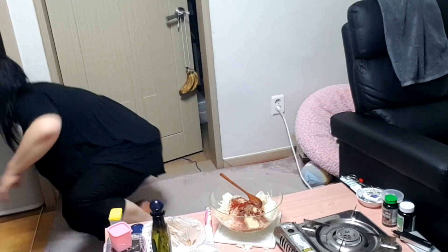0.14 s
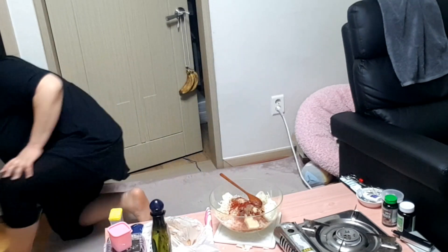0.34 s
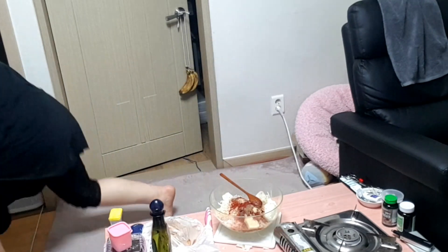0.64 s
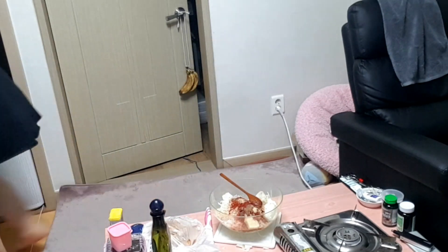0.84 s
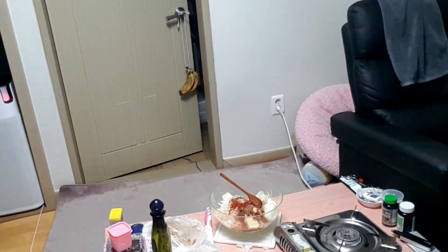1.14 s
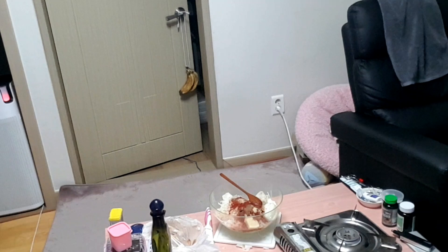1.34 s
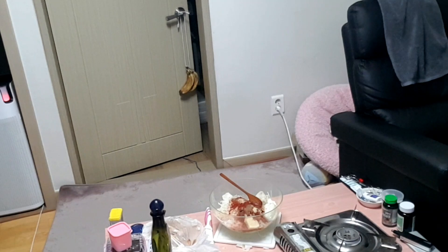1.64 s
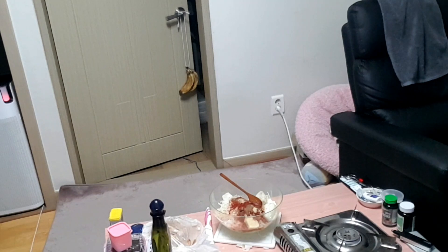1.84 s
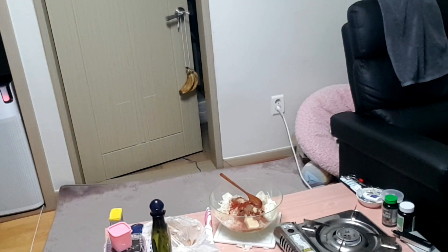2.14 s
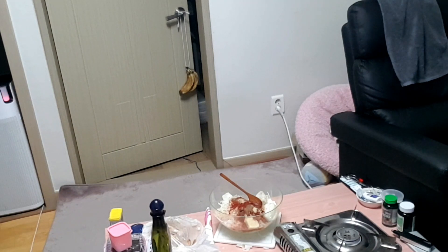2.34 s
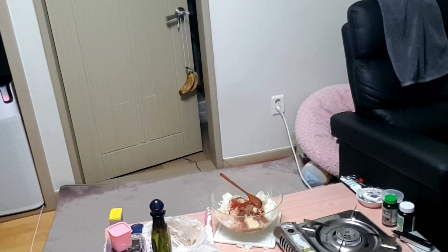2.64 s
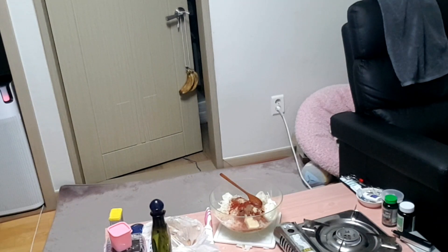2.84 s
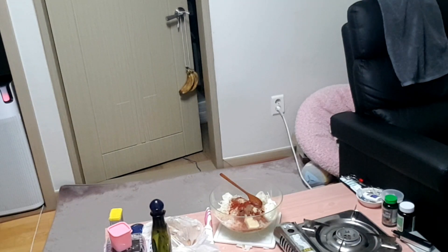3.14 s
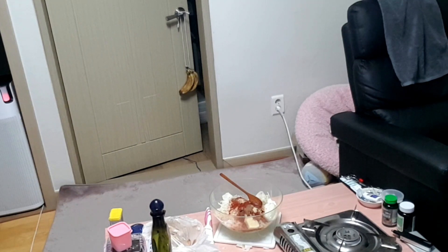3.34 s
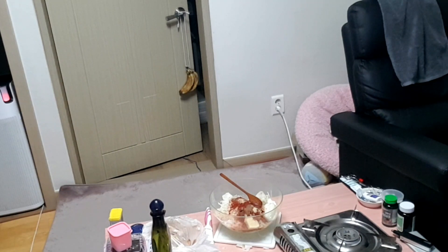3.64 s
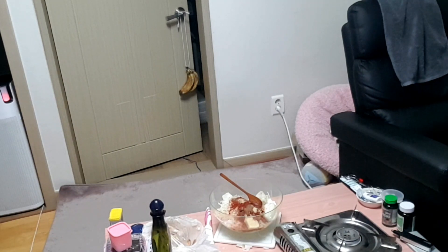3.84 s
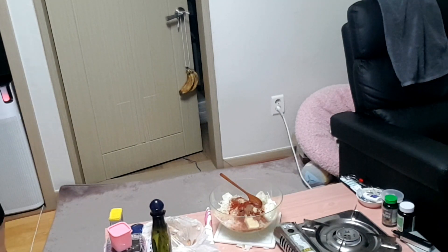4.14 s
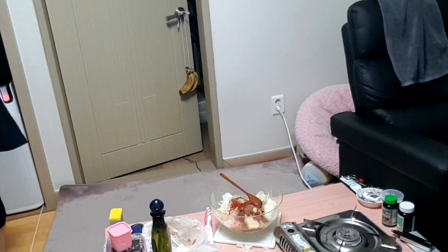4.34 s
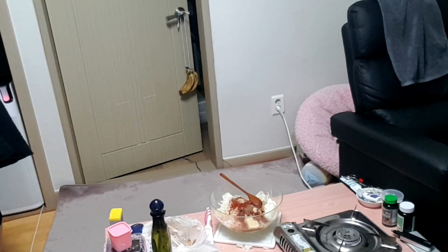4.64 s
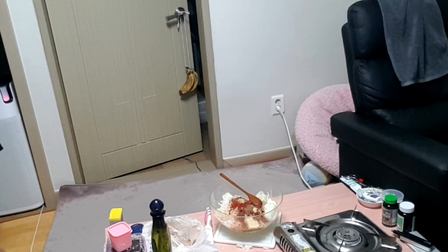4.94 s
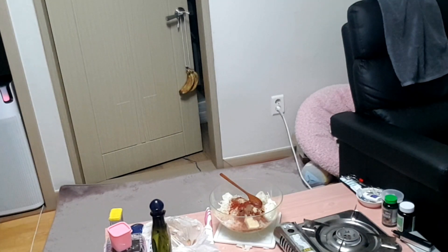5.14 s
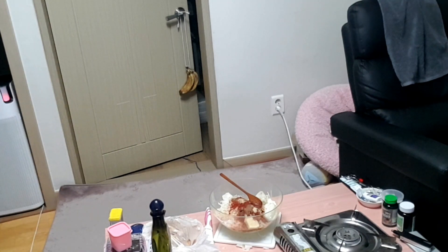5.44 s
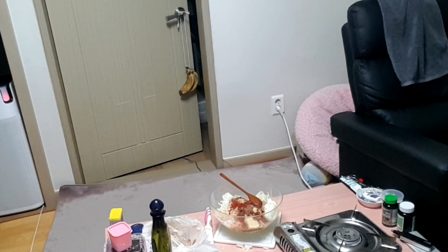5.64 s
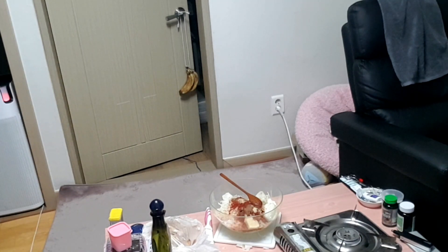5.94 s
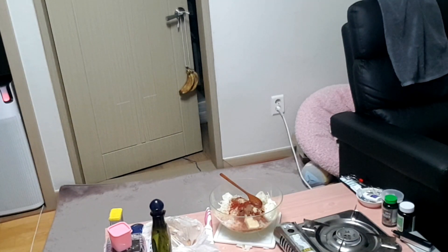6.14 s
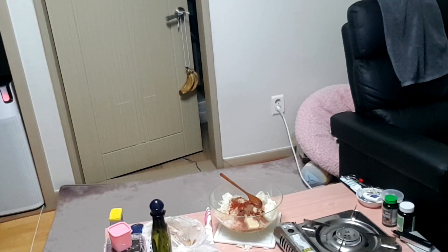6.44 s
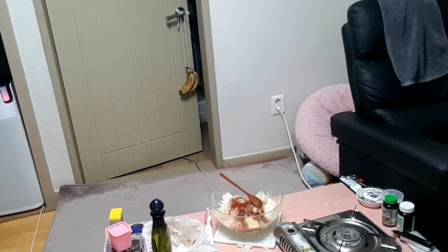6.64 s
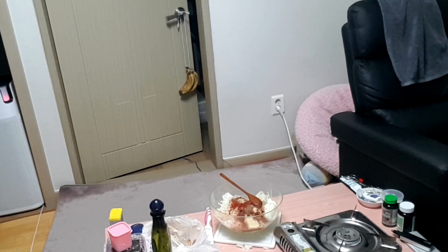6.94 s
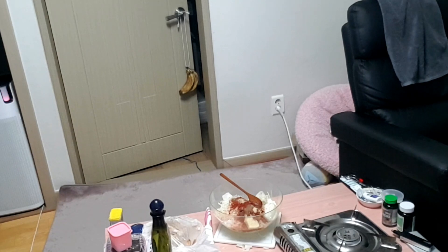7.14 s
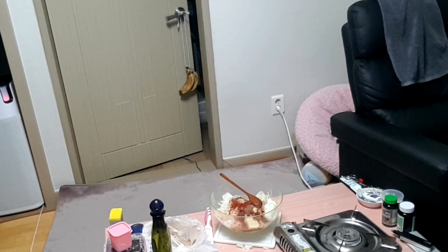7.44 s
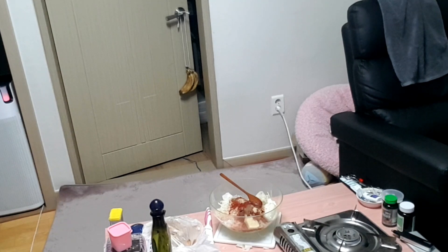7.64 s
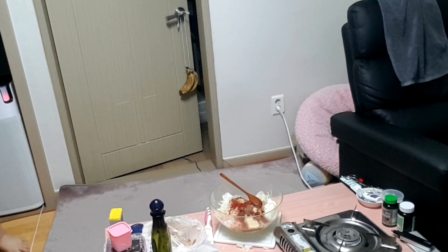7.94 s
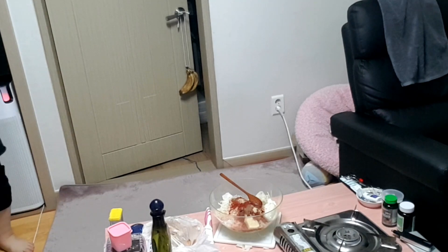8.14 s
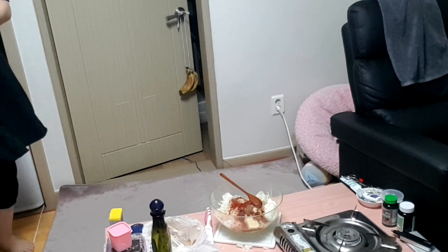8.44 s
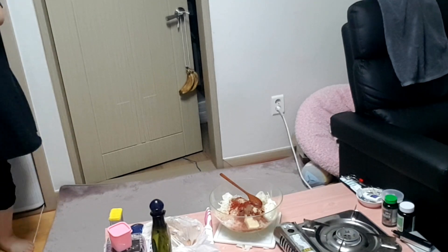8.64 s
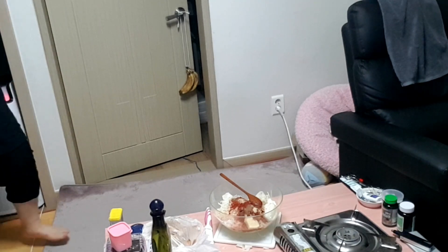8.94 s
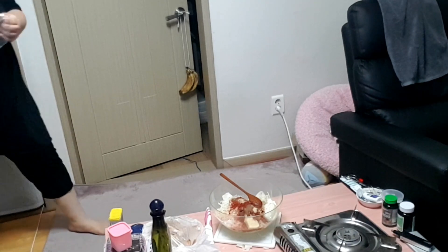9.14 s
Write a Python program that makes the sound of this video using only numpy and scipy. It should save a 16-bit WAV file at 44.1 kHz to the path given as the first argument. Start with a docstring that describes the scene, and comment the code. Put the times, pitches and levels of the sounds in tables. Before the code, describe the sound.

Plastic rustles and containers click and knock in a humming fridge, then its door thumps shut and a bag crinkles.

```python
"""A fridge motor hums throughout in a small furnished room. First someone tugs at a plastic bag in the
fridge: film and clothes rustle in showers of tiny snaps, among brief scrapes and sharp plastic clicks.
From about 5 s containers knock on the shelves more often, and hollow ones ring briefly. Near 7.9 s the
door thumps shut and rebounds on its seal, exciting its panel, the cabinet and the racks.
Last, the bag rustles again as it is carried out into the room."""
import sys
import numpy as np
from scipy import signal
from scipy.fft import rfft, irfft, next_fast_len
from scipy.io import wavfile
from scipy.ndimage import map_coordinates

SR = 44100
rng = np.random.default_rng(int(sys.argv[2]) if len(sys.argv) > 2 else 0)


def put_to_file(sound):
    """Save the sound as 16-bit audio at rate SR, in the file named by the first command-line argument."""
    columns = np.atleast_2d(sound).T  # one column per channel
    safe = np.clip(columns, -1, 1)
    whole_steps = np.round(safe * 32767)
    wavfile.write(sys.argv[1], SR, whole_steps.astype(np.int16))


N = 409688

# Likeness of left and right in a diffuse field: (frequency [Hz], coherence [0..1])
COHERENCE = [(100, 0.98), (250, 0.98), (500, 0.44), (1000, 0.095), (3000, 0), (15000, 0)]
# Reverberation of the room: (frequency [Hz], t60 [s])
ROOM_DECAY = [(80, 0.36), (250, 0.35), (600, 0.33), (2000, 0.22), (5000, 0.27), (14000, 0.22)]
# Motor tones: (frequency [Hz], level [dB])
MOTOR_TONES = [(172.3, -61.5), (780.6, -84)]
# Spectra of air, rubbing, crinkling, plastic, shelves and door racks: (frequency [Hz], gain [dB])
AIR_SPECTRUM = [(12, -70), (20, -16), (64, -17.5), (106, -6.5), (140, -9.5), (175, -2), (245, -11.5),
                (404, -22), (439, -25.5), (667, -32.5), (767, -28.5), (932, -33.5), (3850, -67.5),
                (7110, -58.5), (15500, -50)]
RUB_SPECTRUM = [(150, -22.5), (400, 2.5), (750, 0), (1200, 2.5), (2200, -1), (3500, -7.5), (5200, -13.5),
                (9000, -31), (16000, -27)]
CRINKLE_SPECTRUM = [(1000, -49), (3000, -0.5), (5000, -5.5), (7000, -7.5), (10000, -4.5), (13000, -7.5),
                    (15500, -12)]
PLASTIC_SPECTRUM = [(100, -14), (450, -1), (800, -1.5), (1300, 2), (2200, 0.5), (3200, -4.5), (4600, -11.5),
                    (7000, -15.5), (10000, -16), (15500, -21.5)]
SHELF_SPECTRUM = [(30, -20), (75, -7), (120, 4.5), (200, 0), (350, -6.5), (600, -11), (800, -16.5),
                  (1150, -12.5), (1700, -18.5), (3000, -22.5), (6000, -29), (15000, -24)]
RACK_SPECTRUM = [(60, -27), (120, 8), (200, 2), (310, -3.5), (450, -8), (800, -10), (1400, -10),
                 (2200, -14), (3200, -22), (4500, -31), (8000, -41), (15000, -49)]
# Spells in which clothes rub: (start [s], end [s], level [dB])
CLOTHES_SPELLS = [(0.0, 0.33, -59.5), (0.4, 0.918, -62), (1.294, 1.95, -67.5), (2.258, 3.372, -63.5),
                  (3.55, 3.91, -66.5), (4.78, 5.585, -65.5), (6.25, 7.2, -63.5), (8.15, 9.29, -65)]
# Tugs at the thin bag: (peak time [s], rubbing level [dB], crinkle over rubbing [dB], swell [s])
BAG_TUGS = [(0.175, -66, -1.5, .035), (0.275, -58, -12, .018), (1.63, -64, 1.5, 0.042),
            (1.695, -57, -5, 0.021), (1.89, -71.5, 1, 0.03), (2.09, -59, -3.5, 0.022),
            (2.13, -59, -1.5, 0.0071), (2.287, -49.5, -5.5, 0.038), (2.432, -53, -2.5, 0.019),
            (2.49, -51.5, -4.5, 0.043), (2.66, -65.5, 3.5, 0.037), (2.865, -62.5, 2.5, .025),
            (3.026, -48, -4.5, 0.036), (3.15, -56, -5.5, 0.037), (3.225, -54.5, -7, 0.031),
            (3.78, -67.5, 6.5, 0.018), (3.855, -60.5, -5, 0.022), (4.255, -65, -9, 0.053),
            (4.85, -60, 1, 0.031), (4.971, -59.5, 2, .024), (6.265, -57.5, 1, 0.024),
            (6.555, -60.5, -2.5, 0.031), (6.68, -59, -10, 0.045), (6.925, -50.5, -16, 0.024),
            (7.1, -58, -14, 0.0099), (7.701, -60, 1.5, 0.018), (8.14, -57, -6, 0.022),
            (8.21, -58.5, 2.5, 0.019), (8.293, -62.5, 2, 0.017), (8.414, -56, 0, 0.025),
            (8.545, -56.5, 4, 0.023), (8.63, -68, -8, 0.019), (8.7, -61.5, 4.5, 0.06),
            (8.88, -59, 3, 0.029), (9.01, -56.5, 3, 0.011), (9.08, -54, 1.5, 0.023),
            (9.185, -52.5, -0.5, 0.028)]
# Short slides: (peak time [s], level [dB], swell [s], resonance [Hz])
SLIDES = [(0.14, -60.5, 0.02, 3500), (0.275, -57, 0.013, 900), (0.272, -65, .012, 9050),
          (0.79, -62.5, 0.023, 3550), (0.878, -52, 0.01, 1880), (2.258, -60, 0.0082, 3000),
          (6.189, -58, .011, 2980), (6.65, -60, 0.0077, 2750), (6.83, -63, 0.0082, 2200),
          (7.158, -61, .005, 2180)]
# Small hard contacts: (time [s], level [dB], treble gain [dB], contact length [s], resonance [Hz])
PLASTIC_CONTACTS = [(.491, -38, 0.5, 0.017, 1890), (.575, -44, -6, 0.021, 1830),
                    (0.869, -54, -10, 0.0046, 1950), (0.979, -41.5, 16, 0.008, 1810),
                    (1.097, -32, -9, 0.00061, 1230), (1.1, -29.5, 4, 0.00076, 2150),
                    (1.327, -50.5, 5, 0.016, 2800), (4.017, -41.5, -1.5, 0.015, 1480),
                    (4.074, -43.5, 9.5, 0.0052, 2180), (5.032, -38, 2, 0.0065, 2650),
                    (5.119, -52.5, 5, 0.0045, 2300), (5.223, -32, 0, 0.022, 3050),
                    (5.238, -41, 13.5, 0.017, 1490), (5.264, -36.5, -19, 0.0041, 2280),
                    (5.406, -42, -24, 0.0074, 1470), (6.171, -51, 9.5, 0.0051, 3040),
                    (7.198, -49, 8, 0.011, 2620), (7.702, -32.5, 1, 0.009, 2050),
                    (7.894, -45, 9, 0.003, 3800), (7.998, -45.5, 8, 0.015, 2500),
                    (8.805, -32.5, 0.5, 0.0018, 2450), (8.992, -47.5, 16, 0.0066, 1280)]
# Two footsteps near the start, then blows on shelves: (time [s], relative level [dB], corner [Hz], bass gain
# [dB], contact length [s])
THUDS = [(.492, -46, 1300, -11, 0.0062), (.578, -48, 1000, -3, .02),
         (5.302, -41.5, 160, -2.5, 0.0086), (5.407, -43, 1500, 4, 0.0083),
         (6.155, -45, 1800, -12, 0.012), (6.261, -32.5, 1250, -2.5, 0.016),
         (6.387, -38.5, 1140, -5.5, 0.013), (6.543, -36.5, 1250, -4.5, 0.024),
         (6.88, -50, 1800, 1, 0.0054), (6.916, -33.5, 810, 2, 0.014), (7.023, -42, 1800, -2, 0.0026),
         (7.071, -39, 875, 2, 0.0062), (7.197, -27.5, 1300, -11, 0.009),
         (7.258, -48, 1400, -12, 0.011), (7.411, -35, 650, 5, 0.0039), (7.44, -42, 302, 8, 0.016)]
# Notes of nudged hollow containers: (time [s], frequency [Hz], relative level [dB], t60 [s])
CONTAINER_NOTES = [(2.458, 614, -36.5, 0.18), (2.455, 1095, -40, 0.05), (2.45, 800, -46, 0.088),
                   (5.238, 1440, -35.5, 0.2), (5.304, 131, -28, 0.29), (6.769, 228.7, -38.5, 0.054),
                   (6.772, 400, -39.5, 0.086), (6.265, 352, -41.5, 0.13), (6.56, 620, -43.5, 0.11),
                   (6.92, 300, -42, .1), (7.198, 538, -25, 0.12), (7.198, 1104, -27, 0.026),
                   (7.2, 324, -47, 0.23), (7.2, 830, -31.5, 0.16), (7.2, 1130, -35, .25)]
# Modes of the cabinet and its racks: (frequency [Hz], relative level [dB])
CABINET_MODES = [(222, 0), (320, -3.5), (366, -1), (445, 0.5), (484, -6), (560, -4.5), (591, -3), (634, -6),
                 (727, -6.5), (804, -15), (1066, -10), (1143, -9), (1201, -9), (1342, -9), (1442, -13),
                 (1687, -25)]
# Deep modes of the door panel: (frequency [Hz], relative level [dB], t60 [s])
PANEL_MODES = [(36, -10, 0.26), (67.7, -3, 0.18), (80, 3, 0.17), (110, -6.5, 0.52), (140, -1.5, 0.14),
               (176, 2.5, 0.069)]
# Door against frame: (time [s], panel gain [dB], rattle level [dB], contact length [s], corner [Hz])
DOOR_BLOWS = [(7.8863, -14.5, -15.5, 0.0069, 6000), (7.9009, -5.5, -16, 0.0045, 3480),
              (7.9304, -14, -23, 0.0092, 1500), (7.9986, -23.5, -22, 0.0018, 1170),
              (8.0106, -15.5, -30.5, 0.0065, 890), (8.052, -20.5, -31.5, 0.0038, 1290),
              (8.078, -23, -38, 0.006, 800)]

STROKE_LEAD_S = .25  # a stroke's envelope begins this long before its peak


def amp(db):
    """Amplitude ratio: a factor of ten for every 20 dB."""
    return 10 ** (np.asarray(db) / 20)


def unit(x):
    """Normalisation to an rms of 1."""
    return x / np.sqrt(np.mean(x ** 2) + 1e-20)


def along(points, hz):
    """Interpolation of (frequency, value) points on a logarithmic frequency axis."""
    f, v = np.transpose(points)
    return np.interp(np.log(hz + 1), np.log(f + 1), v)


def wobble(per_s):
    """Slow random modulation: a spline through per_s random knots a second."""
    knots = rng.standard_normal(int(N * per_s / SR) + 4)
    return map_coordinates(knots, [np.arange(N) * per_s / SR])


def coloured(x, gain):
    """Minimum-phase filtering: the causal response with magnitude gain(hz)."""
    m = 2 ** 14
    cepstrum = irfft(np.log(np.maximum(gain(np.fft.rfftfreq(m, 1 / SR)), 1e-6)))
    cepstrum[1:m // 2] *= 2
    cepstrum[m // 2 + 1:] = 0
    response = irfft(np.exp(rfft(cepstrum)))[:m // 2]
    size = next_fast_len(x.shape[-1] + m // 2, real=True)
    return irfft(rfft(x, size) * rfft(response, size), size)[..., :x.shape[-1]]


def add(track, s, sound):
    """Superposition: a sound joins the track at s seconds."""
    start = round(s * SR)
    sound, start = sound[:, max(0, -start):], max(0, start)
    track[:, start:start + sound.shape[-1]] += sound[:, :N - start]


def at_level(sound, db):
    """Equal energy: a transient is scaled to match 10 ms of steady sound at db."""
    return amp(db) * sound / np.sqrt(np.sum(sound ** 2) / (2 * SR / 100))


def diffuse(size):
    """Diffuse field: noise from all around is coherent in the bass, unrelated in the treble."""
    m = next_fast_len(size, real=True)
    angle = np.arccos(np.clip(along(COHERENCE, np.fft.rfftfreq(m, 1 / SR)), -1, 1)) / 2
    spectra = rfft(rng.standard_normal((2, m))) * [np.cos(angle), np.sin(angle)]
    mid, side = irfft(spectra, m)[:, :size]
    return np.array([mid + side, mid - side])


def arrive(x, lag_samples=14):
    """Path difference: direct sound reaches the left channel slightly later."""
    return np.array([np.pad(x, (lag_samples, 0))[:len(x)], x])


def lean(x, left_db):
    """Level difference: above the bass, the left channel is louder than the right."""
    shade = lambda hz: left_db / 2 * hz ** 2 / (hz ** 2 + 300 ** 2)
    return np.array([coloured(x[0], lambda hz: amp(shade(hz))),
                     coloured(x[1], lambda hz: amp(-shade(hz)))])


def blow(length, tail_db, early_db, early_t60):
    """Impact in a room: a direct noise burst, early reflections and a reverberant tail."""
    size = SR // 3
    t = np.arange(size) / SR
    progress = t / max(length, 3e-4)
    power = progress * np.exp(-2 * progress)
    power /= power.sum()
    direct = arrive(rng.standard_normal(size) * np.sqrt(power))
    smear = np.abs(signal.fftconvolve(power, amp(-60 * t / early_t60) ** 2)[:size])
    early = diffuse(size) * np.sqrt(smear / smear.sum())
    hz, age, bands = signal.stft(diffuse(size), SR, nperseg=256)
    decay = amp(-60 * age / along(ROOM_DECAY, hz)[:, None])
    tail = signal.istft(bands * decay, SR, nperseg=256)[1][:, :size]
    tail = unit(tail * np.cumsum(power)) / np.sqrt(size)
    return direct + amp(early_db) * early + amp(tail_db) * tail


def ring(hz, t60, blur_rad):
    """Damped mode: reflections blur its phase, and short waves differ in phase between the sides."""
    t = np.arange(SR // 2) / SR
    phase = 2 * np.pi * rng.random() + rng.standard_normal((2, 1)) * min(hz / 900, np.pi)
    drift = blur_rad * np.interp(t, np.linspace(0, .5, 64), rng.standard_normal(64))
    envelope = amp(-60 * t / t60) * (1 - np.exp(-t / 0.0024))
    return np.sin(2 * np.pi * hz * t + phase + drift) * envelope


def stroke(swell, fade_ratio=1.29, roundness=1.42):
    """Power envelope of a hand's stroke: it swells to a peak and fades a little more slowly."""
    age = np.arange(int(.6 * SR)) / SR - STROKE_LEAD_S
    distance = np.abs(age) / np.where(age < 0, swell, swell * fade_ratio)
    return np.exp(-np.minimum(distance, 20) ** roundness)


def motor(air_db=-49, waver_db=3):
    """Tones over broadband noise: a motor hum wavers in level and phase over a low rush of air."""
    t = np.arange(N) / SR
    air = unit(coloured(diffuse(N), lambda hz: amp(along(AIR_SPECTRUM, hz))))
    hum = sum(amp(db + waver_db * wobble(3.3)) * np.sin(2 * np.pi * hz * t + 1.1 * wobble(7))
              for hz, db in MOTOR_TONES)
    return amp(air_db) * air + np.sqrt(2) * hum


def handling_gains(idle_db=-70, ramp_s=0.2, clothes_crinkle_db=-8):
    """Incoherent sources add in power: clothes and tugs set the gains of rubbing and crinkling."""
    t = np.arange(N) / SR
    clothes = np.full(N, amp(idle_db))
    for start, end, db in CLOTHES_SPELLS:
        spell = np.interp(t, [start - ramp_s, start, end, end + ramp_s], [0, 1, 1, 0])
        clothes = np.maximum(clothes, amp(db) * spell)
    power = (clothes * amp([[0], [clothes_crinkle_db]])) ** 2
    for s, db, crinkle_db, swell in BAG_TUGS:
        add(power, s - STROKE_LEAD_S, amp([[db], [db + crinkle_db]]) ** 2 * stroke(swell))
    return np.sqrt(power)


def carried(x, step_out_s=8.1):
    """Path difference follows direction: the lag shortens when the bag is carried into the room."""
    return np.where(np.arange(N) < step_out_s * SR, arrive(x, 16), arrive(x, 7))


def rustle(snaps_per_s=380, spread_db=3, direct_db=-5, smear_t60=0.15):
    """Shot noise: rubbing and crinkling are showers of tiny snaps, smeared by the near walls."""
    out, t = np.zeros((2, N)), np.arange(SR // 8) / SR
    for gain, spectrum in zip(handling_gains(), (RUB_SPECTRUM, CRINKLE_SPECTRUM)):
        snaps = (rng.random(N) < snaps_per_s / SR) * amp(spread_db * rng.standard_normal(N)) ** 2
        shower = lambda t60: np.sqrt(np.abs(signal.fftconvolve(snaps, amp(-60 * t / t60) ** 2)[:N]))
        reflected = unit(diffuse(N) * shower(smear_t60))
        direct = unit(carried(rng.standard_normal(N) * shower(0.01)))
        grains = coloured(reflected + amp(direct_db) * direct, lambda hz: amp(along(spectrum, hz)))
        out += gain * unit(grains)
    return out


def scrapes(relative_width=.45):
    """Sliding friction: its noise is filtered by one resonance of each object."""
    out = np.zeros((2, N))
    for s, db, swell, body_hz in SLIDES:
        push = np.sqrt(stroke(swell))
        body = lambda hz: np.hypot(1, (hz / body_hz - body_hz / (hz + 1)) / relative_width) ** -2
        friction = diffuse(len(push)) + arrive(rng.standard_normal(len(push)))
        add(out, s - STROKE_LEAD_S, amp(db) * unit(coloured(friction, body)) * push)
    return out


def clicks(body_db=6, sharpness=5):
    """Impulse excitation: plastic lids and catches tick on a resonance; hard edges add treble."""
    out = np.zeros((2, N))
    for s, db, treble_db, length, body_hz in PLASTIC_CONTACTS:
        body = lambda hz: body_db / (1 + (sharpness * (hz / body_hz - 1)) ** 2)
        edge = lambda hz: treble_db * hz ** 4 / (hz ** 4 + 4200 ** 4)
        # small objects radiate little below their resonance
        radiation = lambda hz: hz ** 3 / (hz ** 3 + (0.33 * body_hz) ** 3)
        colour = lambda hz: amp(along(PLASTIC_SPECTRUM, hz) + body(hz) + edge(hz)) * radiation(hz)
        tick = blow(length, tail_db=-1, early_db=3, early_t60=.07)
        add(out, s, at_level(coloured(tick, colour), db))
    return out


def knocks(gain_db=3):
    """Contact compliance: soft footsteps and bumps on the shelves lose their treble; heavy ones gain bass."""
    out = np.zeros((2, N))
    for s, db, corner_hz, bass_db, length in THUDS:
        bass = lambda hz: bass_db / (1 + (hz / 250) ** 4)
        softness = lambda hz: 1 / np.hypot(1, (hz / corner_hz) ** 1.23)
        colour = lambda hz: amp(along(SHELF_SPECTRUM, hz) + bass(hz)) * softness(hz)
        bump = blow(length, tail_db=0, early_db=4, early_t60=.09)
        add(out, s, at_level(coloured(bump, colour), db + gain_db))
    return out


def containers(gain_db=-3):
    """Free vibration: nudged hollow containers ring briefly at their natural frequencies."""
    out = np.zeros((2, N))
    for s, hz, db, t60 in CONTAINER_NOTES:
        add(out, s, at_level(ring(hz, t60, blur_rad=0.72), db + gain_db))
    return out


def door(cabinet_db=-3, cabinet_t60=0.12, seal_delay_s=0.0027):
    """Modal superposition: each blow swings the heavy panel, rings the cabinet and shakes the racks."""
    out, t = np.zeros((2, N)), np.arange(SR // 2) / SR
    panel = sum(np.sin(2 * np.pi * hz * t) * amp(db - 60 * t / t60) for hz, db, t60 in PANEL_MODES)
    boom = -panel * (1 - np.exp(-t / 0.0063))
    for s, panel_db, rattle_db, length, corner_hz in DOOR_BLOWS:
        # the seal compresses before the panel swings
        add(out, s + seal_delay_s, amp(panel_db) * np.array([boom, boom]))
        softness = lambda hz: 1 / np.hypot(1, hz / corner_hz)
        cabinet = sum(amp(db + rng.normal(0, 2.1)) * softness(hz) * ring(hz, cabinet_t60, blur_rad=0.14)
                      for hz, db in CABINET_MODES)
        add(out, s, at_level(cabinet, rattle_db + cabinet_db))
        jolt = blow(length, tail_db=2.5, early_db=5.5, early_t60=0.13)
        rattle = coloured(jolt, lambda hz: amp(along(RACK_SPECTRUM, hz)) * softness(hz))
        add(out, s, at_level(rattle, rattle_db))
    return out


def scene():
    """Superposition: handling and impacts are louder on the left, the motor slightly on the right."""
    handling = clicks() + rustle() + scrapes()
    fridge = door() + knocks() + containers()
    return lean(handling + fridge, left_db=1.7) + motor() * amp([[-.4], [.4]])


def record(dry):
    """Soft saturation rounds the loudest peaks; a low-pass filter then limits the band."""
    ceiling, knee, top_hz = .92, 8, 15650
    rounded = dry / (1 + np.abs(dry / ceiling) ** knee) ** (1 / knee)
    m = next_fast_len(N + SR // 2)
    passband = np.fft.rfftfreq(m, 1 / SR) < top_hz
    return irfft(rfft(rounded, m) * passband, m)[:, :N]


dry = scene()
out = record(dry)
put_to_file(out)
```